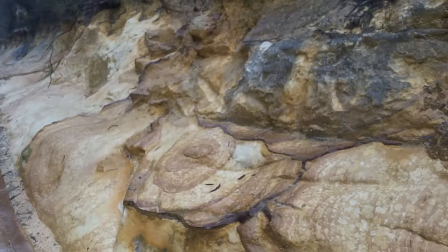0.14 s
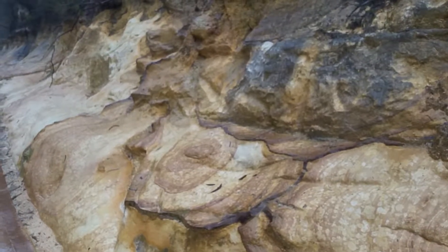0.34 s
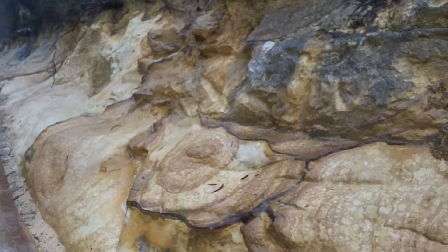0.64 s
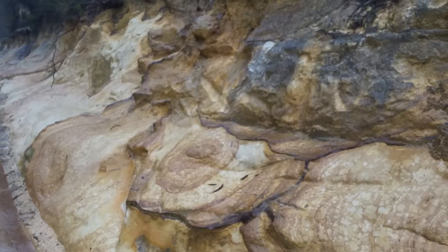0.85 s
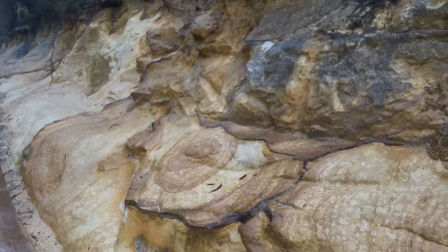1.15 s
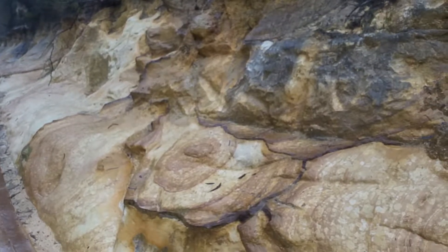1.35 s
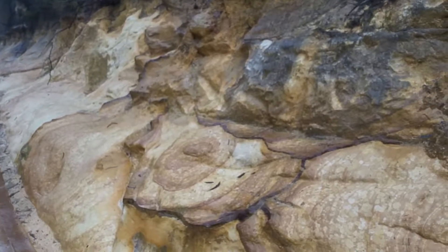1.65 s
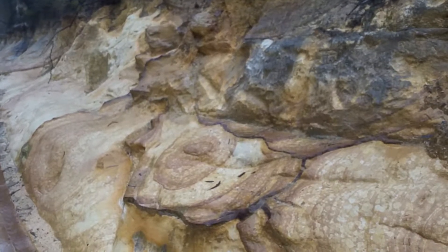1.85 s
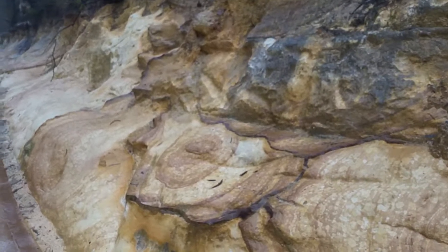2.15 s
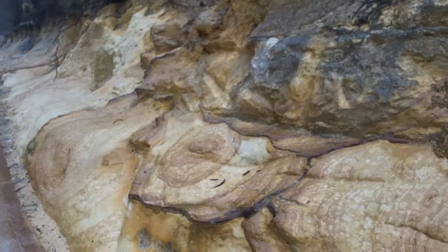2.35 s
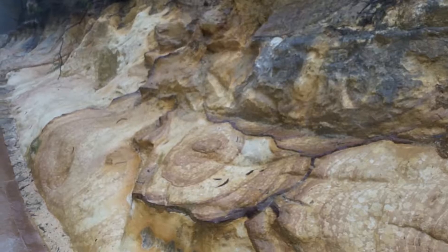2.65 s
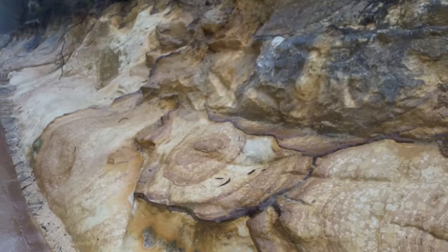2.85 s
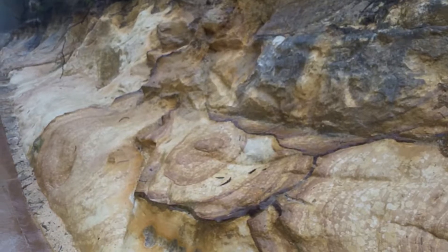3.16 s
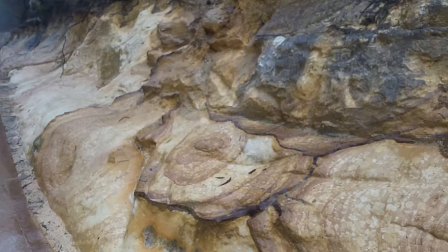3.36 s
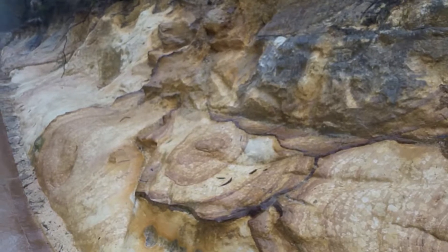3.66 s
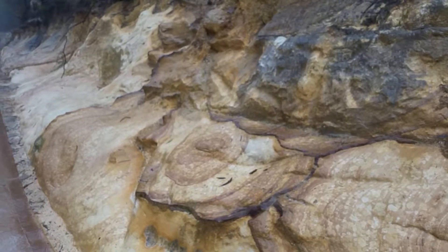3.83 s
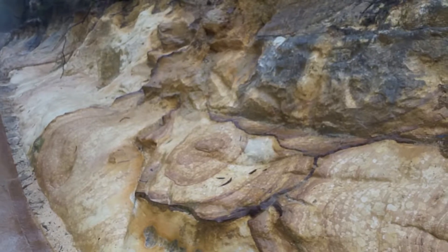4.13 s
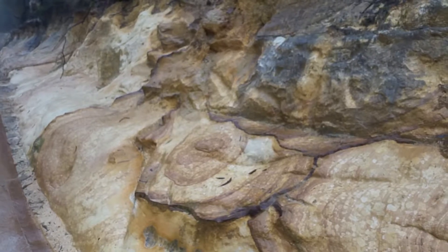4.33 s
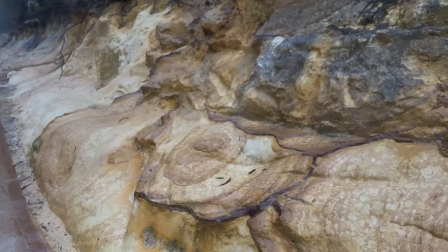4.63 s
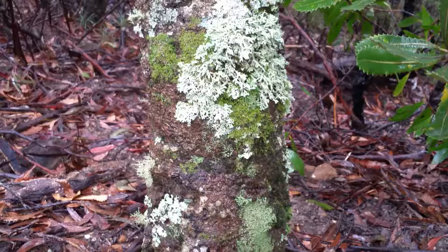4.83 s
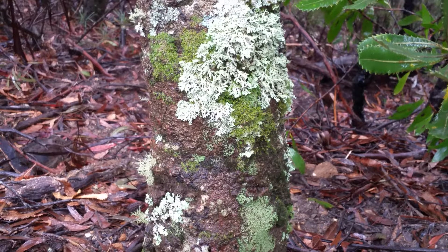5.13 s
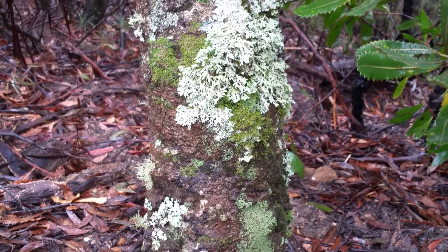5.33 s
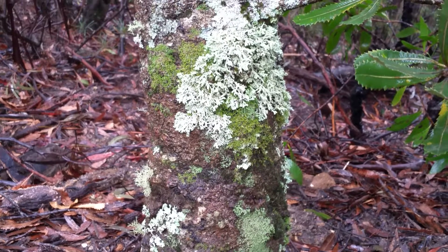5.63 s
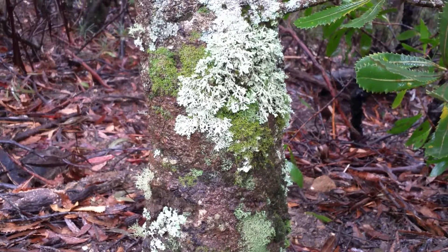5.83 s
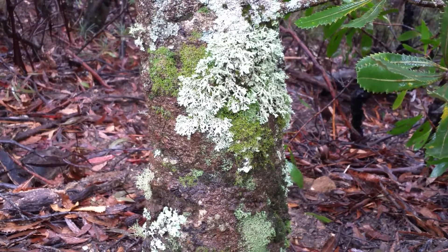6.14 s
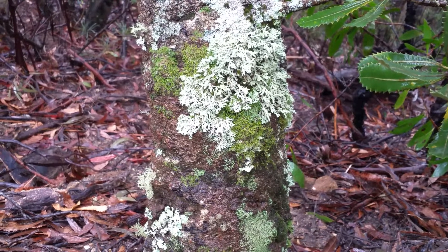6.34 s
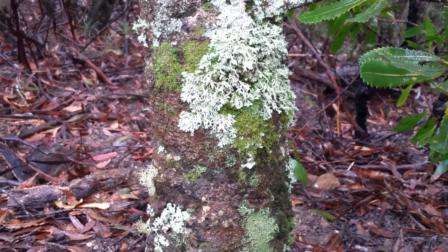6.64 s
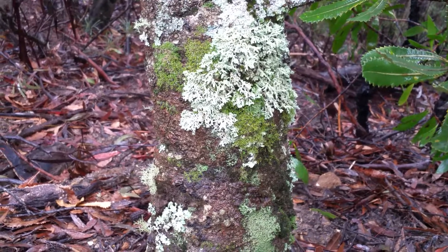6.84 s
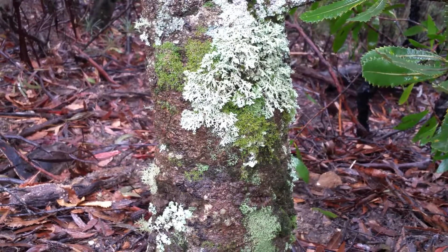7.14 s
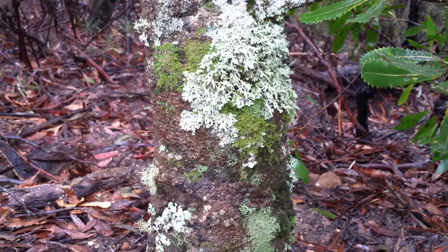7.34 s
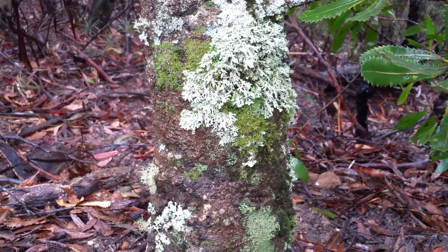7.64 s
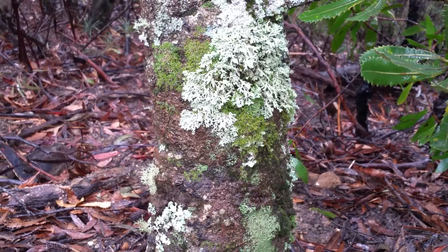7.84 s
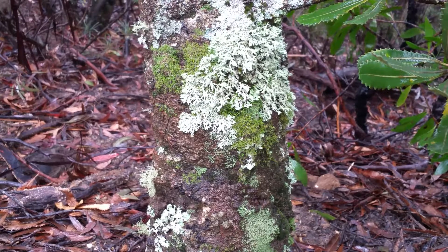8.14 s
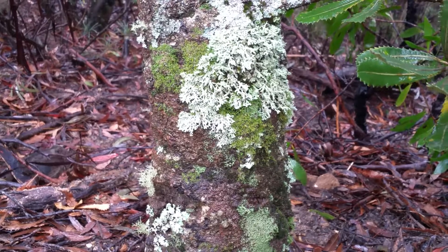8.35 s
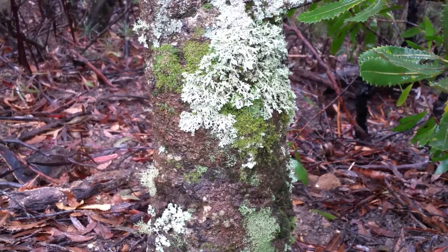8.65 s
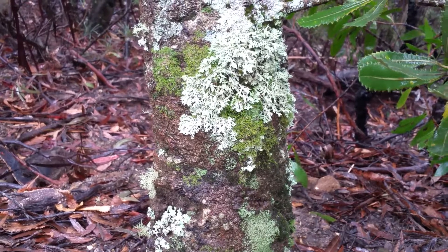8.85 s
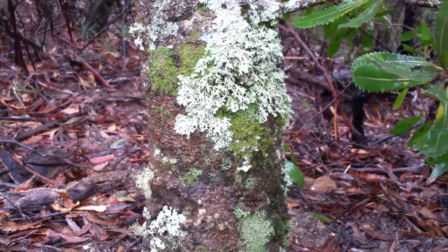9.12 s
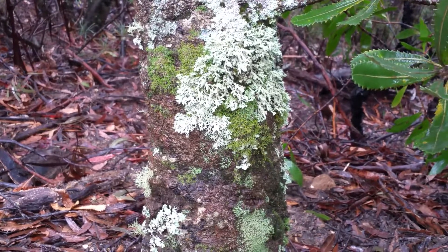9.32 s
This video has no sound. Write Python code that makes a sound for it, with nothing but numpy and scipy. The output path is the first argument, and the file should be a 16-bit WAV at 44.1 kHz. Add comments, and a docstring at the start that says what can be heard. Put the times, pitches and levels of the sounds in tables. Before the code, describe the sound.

Close, crisp water drops patter on leaves and soggy ground, growing heavier midway, while a faraway engine idles low, then rises in pitch.

```python
"""Wet bush in the rain, among trunks and rock, with a distant engine.
Heavy drips slap the leaf litter close by: each is a damped pressure pulse, a thud and a noise burst of spray.
Lighter drips, random patter, leaf ticks, bubble plops and sizzling droplets join them, with a short echo.
Far drops merge into a wash of coloured noise; over it lies a fine hiss, and both follow the rain's strength.
The engine sums its firing note, uneven orders above it and a rumble; it idles, then picks up speed."""
import sys
import numpy as np
from scipy import signal
from scipy.fft import rfft, irfft, next_fast_len
from scipy.io import wavfile
from scipy.ndimage import map_coordinates

SR = 44100
rng = np.random.default_rng(int(sys.argv[2]) if len(sys.argv) > 2 else 0)


def store_wav(level_fs):
    """Save 16-bit WAV to argv[1]."""
    pcm = np.round(np.clip(np.atleast_2d(level_fs), -1, 1) * 32767)
    wavfile.write(sys.argv[1], SR, pcm.T.astype(np.int16))


N = 418068
TOP_HZ = 16000  # band limit
DROP_SIZE = 2048  # samples in one drop sound
# fine hiss at the usual rain [dB], and its gain per dB of rain [dB/dB]
HISS_DB, HISS_GROWS = -64, 0.37
# lag of the right ear behind the left: mean and spread [ms]
LAG_MS, LAG_SPREAD_MS = 0.079, 0.097


def amp(db):
    """Logarithmic level: decibels to amplitude gain."""
    return 10 ** (np.asarray(db) / 20)


def unit(x):
    """Power normalization: scale to rms 1."""
    return x / np.sqrt(np.mean(x ** 2) + 1e-20)


def along(points, hz):
    """Logarithmic frequency scale: read (frequency [Hz], value) points between their knots."""
    f, v = np.transpose(points)
    return np.interp(np.log(hz + 1), np.log(f + 1), v)


def curves(rows):
    """Linear interpolation in time: one value per sample for each column after the time."""
    s, *cols = np.transpose(rows)
    return [np.interp(np.arange(N) / SR, s, c) for c in cols]


def wobble(rate):
    """Band-limited fluctuation: a smooth curve through random knots, rate knots a second."""
    knots = rng.standard_normal(int(N * rate / SR) + 4)
    return map_coordinates(knots, [np.arange(N) * rate / SR])


def filtered(x, response):
    """Linear filtering: multiply the spectrum of x by a response of frequency."""
    m = next_fast_len(N + SR // 2)
    return irfft(rfft(x, m) * response(np.fft.rfftfreq(m, 1 / SR)), m)[..., :N]


def place(times, sounds):
    """Superposition: sum short stereo sounds (2 x events x samples) at their times [s]."""
    first = np.round(times * SR).astype(int)[:, None]
    at = np.maximum(first + np.arange(sounds.shape[-1]), 0)
    return np.array([np.bincount(at.ravel(), side.ravel(), N)[:N] for side in sounds])


# likeness of the two ears in a diffuse sound: (frequency [Hz], coherence [0 to 1])
EAR_COHERENCE = [(100, 0.77), (300, 0.74), (600, 0.3), (1200, 0), (3000, 0.48), (10000, 0)]


def rush(spectrum):
    """Diffuse-field coherence: coloured stereo noise of rms 1, mixed from a mid and a side signal."""
    def turn(hz):
        return np.arccos(np.clip(along(EAR_COHERENCE, hz), -1, 1)) / 2

    def response(hz):
        return amp(along(spectrum, hz)) * [np.cos(turn(hz)), np.sin(turn(hz))]

    mid, side = filtered(rng.standard_normal((2, N)), response)
    return unit(np.array([mid + side, mid - side]))


# strength of the rain, driving the wash, the hiss and the random drops: (time [s], strength [dB])
RAIN_STRENGTH = [(0.0, -55), (0.48, -58.5), (0.7, -54.5), (1.0, -56), (1.3, -54), (2.05, -57), (2.45, -58),
                 (2.72, -62), (3.15, -58.5), (3.55, -55.5), (4.4, -57.5), (4.85, -55.5), (5.1, -50),
                 (5.6, -53), (6.4, -51), (8.3, -55.5), (9.1, -52), (9.48, -54.5)]


def surge():
    """Relative level: dB by which the rain exceeds its usual strength, per sample."""
    usual_db = -55
    return curves(RAIN_STRENGTH)[0] - usual_db


# spectrum of the wash: (frequency [Hz], relative density [dB per Hz])
WASH_SPECTRUM = [(100, -17), (200, -8), (400, -1), (950, 0.5), (1600, -7.5), (2500, -4.5), (4000, -27),
                 (7000, -15.5), (16000, -29)]
# spectrum of the fine hiss: (frequency [Hz], relative density [dB per Hz])
HISS_SPECTRUM = [(1500, -5.5), (4000, 3.5), (5500, 3.5), (7000, -9), (8300, 0), (10000, 4.5), (11300, -7),
                 (16000, -13)]


def wash_and_hiss(wash_db=-58.5, wash_grows=0.55):
    """Incoherent summation: far drops merge into a wash; over it lies a fine hiss, partly microphone noise."""
    strength = surge()
    wash_flicker = 1.5 * wobble(14) + 2.1 * wobble(110)
    hiss_flicker = 0.7 * wobble(4) + 1.5 * wobble(24) + 1.9 * wobble(90)
    wash = amp(wash_db + wash_grows * strength + wash_flicker) * rush(WASH_SPECTRUM)
    hiss = amp(HISS_DB + HISS_GROWS * strength + hiss_flicker) * rush(HISS_SPECTRUM)
    return wash + hiss


# engine: (time [s], mean firing rate [Hz], relative throb level [dB], firing note level [dB])
ENGINE_COURSE = [(0, 54.03, -52.5, -63), (2.4, 53.9, -53.5, -61), (4.8, 53.73, -53.5, -65),
                 (5.1, 56.14, -55.5, -68), (6.1, 57.95, -56, -75), (6.8, 54.3, -57.5, -66),
                 (7.4, 58.3, -52, -55), (7.7, 65.7, -58.5, -59.5), (8.05, 70.6, -58, -51),
                 (8.55, 71.1, -61.5, -57.5), (8.9, 70.6, -64, -46), (9.2, 71.7, -57, -42.5),
                 (9.48, 69.8, -65, -42)]
# uneven orders above the firing note: (multiple of the engine cycle, mean relative level [dB])
THROB_ORDERS = [(10, -6), (11, -10), (12, -8), (13, 0), (14, -.5), (16, -1)]
# spectrum of the engine's rumble: (frequency [Hz], relative density [dB per Hz])
RUMBLE_SPECTRUM = [(15, -34), (30, -5), (42, -17), (65, -23), (95, -1), (135, -4), (200, -6.5), (400, -31)]


def engine(rumble_db=-59, throb_db=1.0, note_db=0, cylinders=8):
    """Engine orders: uneven orders above the firing note beat at idle and give way to the firing note."""
    firing_hz, throb, note = curves(ENGINE_COURSE)
    unsteady_hz = firing_hz * (1 + 0.0027 * wobble(2.61))
    cycle = 2 * np.pi * np.cumsum(unsteady_hz) / SR / cylinders
    uneven = 0
    for order, db in THROB_ORDERS:
        level = amp(db + 0.81 * wobble(2.5))
        uneven = uneven + level * np.sin(order * cycle + rng.uniform(0, 2 * np.pi))
    firing = unit(np.sin(cylinders * cycle)) * amp(note + note_db + 0.35 * wobble(4.2))
    return amp(throb + throb_db) * unit(uneven) + firing + amp(rumble_db) * rush(RUMBLE_SPECTRUM)


def slap_shape(pitch, damping, hz):
    """Damped oscillator: a wet surface swings barely once; lower pitches have a softer edge. Peak 1."""
    swing = 1j * hz / pitch
    softening = (1 + 1j * hz / (4 * pitch + 1500)) ** 2
    pulse = swing / (1 + damping * swing + swing ** 2) / softening
    return pulse / np.abs(irfft(pulse)).max(axis=1, keepdims=True)


# spectrum of the spray of a drop: (frequency [Hz], relative density [dB])
SPRAY_SPECTRUM = [(300, 21), (1500, 4.5), (3000, 8.5), (5000, 4.5), (6500, -4), (8300, 7.5), (10000, 2.5),
                  (12000, -8.5), (16000, -4)]


def slaps(rows, damping, scatter_db, scatter_t60, spray_db, spray_t60, ground_hz=355,
          ground_damping=0.86, litter_hz=650, ring=0.25, mist_db=-20, mist_t60=0.14):
    """Impact and scattering: a slap, a thud of the soil, their scatter off the litter, a burst of spray."""
    s, slap_db, pitch, thud_db, puff_db, lag_ms = np.transpose(rows)[:, :, None]
    t, hz = np.arange(DROP_SIZE) / SR, np.fft.rfftfreq(DROP_SIZE, 1 / SR)
    grit, mist = rng.standard_normal((len(s), 2, 2, DROP_SIZE)).transpose(1, 2, 0, 3)
    stiffness, height = rng.standard_normal((len(s), 2, 1)).swapaxes(0, 1)
    # every leaf adds a brief note of its own
    flex = 1j * hz / (1.6 * pitch * np.exp(0.46 * stiffness))
    leaf = 1 - ring / 2 + 2 * ring * (flex / 6) / (1 + flex / 6 + flex ** 2)
    slap = amp(slap_db) * slap_shape(pitch, damping, hz) * leaf
    thud = amp(thud_db) * slap_shape(np.array([[ground_hz]]), ground_damping, hz)
    # the ground just below answers after about a millisecond and hollows the sound
    ground_delay = .0009 * np.exp(.25 * height)
    pulse = (slap + thud) * (1 + .15 * np.exp(-2j * np.pi * hz * ground_delay))
    # the litter throws the pulse back by many short paths; long waves pass over it
    paths = grit * amp(-60 * t / scatter_t60) * (1 - np.exp(-t / 0.0002))
    paths = rfft(paths / np.linalg.norm(paths, axis=2, keepdims=True))
    paths = paths * 1j * hz / (litter_hz + 1j * hz)
    shared = np.clip(along(EAR_COHERENCE, hz), 0, 1)
    paths[1] = shared * paths[0] + np.sqrt(1 - shared ** 2) * paths[1]
    # the drop bursts in a gritty spit, then its droplets settle
    decay = amp(-60 * t / spray_t60) + amp(mist_db - 60 * t / mist_t60)
    burst = unit(mist * np.abs(mist)) * decay
    spray = rfft(amp(puff_db + spray_db) * burst) * unit(amp(along(SPRAY_SPECTRUM, hz)))
    # half the lag goes to each ear; the lead [s] leaves room for the earlier one
    lead = .001
    delay = lead + np.array([-lag_ms, lag_ms]) / 2000
    heard = (pulse * (1 + amp(scatter_db) * paths) + spray) * np.exp(-2j * np.pi * hz * delay)
    return place(s[:, 0] - lead, irfft(heard))


def patter(tap_db=-39, spread_db=5.0, tap_grows=0.63, pitch_hz=1750, soil_db=-14, spit_db=-31,
           edge_hz=4200, count=1500):
    """Random arrivals: smaller, farther drops fall more often and harder as the rain strengthens."""
    strength = surge()
    fallen = np.cumsum(amp(strength))
    at = np.searchsorted(fallen, rng.uniform(0, fallen[-1], count))
    size, leaf, soil, wet, bearing = rng.standard_normal((count, 5)).T
    level = tap_db + tap_grows * strength[at] + spread_db * np.minimum(size, 1.1)
    rows = np.transpose([at / SR, level, pitch_hz * np.exp(0.66 * leaf), level + soil_db + 4 * soil,
                         level + spit_db + 4 * wet, 0.2 * np.tanh(bearing)])
    taps = slaps(rows, damping=.75, scatter_db=-5, scatter_t60=.02, spray_db=0, spray_t60=.012)
    # foliage in the way dulls their top
    return filtered(taps, lambda hz: .45 + .55 / (1 + (hz / edge_hz) ** 4))


def spatter(over_db=15.0, spread_db=5, flight=0.008, count=90, size=10):
    """Damped resonance: random showers of tiny droplets from shattered drips prickle on the leaves."""
    t = np.arange(DROP_SIZE // 8) / SR
    shower = rng.uniform(0, N / SR, (count, 1))
    when = (shower + flight * rng.gamma(2, .5, (count, size))).reshape(-1, 1)
    weight, leaf, side = rng.standard_normal((len(when), 3, 1)).swapaxes(0, 1)
    pitch = np.clip(9800 * np.exp(0.25 * leaf), 3000, TOP_HZ)
    strength = np.interp(when, np.arange(N) / SR, surge())
    level = HISS_DB + HISS_GROWS * strength + over_db + spread_db * np.minimum(weight, 2)
    grain = amp(level) * np.sin(2 * np.pi * pitch * t) * np.exp(-pitch * t / 1.3)
    return place(when[:, 0], grain * amp(3.1 * np.array([side, -side])))


def landings(count, crowding):
    """Stratified arrivals: a random sample within each drop's own turn, turns shorter in stronger rain."""
    fallen = np.cumsum(amp(crowding * surge()))
    turn = (np.arange(count) + rng.uniform(0, 1, count)) / count
    return np.minimum(np.searchsorted(fallen, turn * fallen[-1]), N - 1)


def light_drips(slap_db=-30, spread_db=2.0, pitch_hz=1200, soil_db=-16, soil_spread_db=3.5, spit_db=-26,
                spit_spread_db=2.5, slap_grows=0.43, crowding=0.5, rebound_db=-6, rebound_s=0.008, count=105):
    """Double impact: lighter drips glance off onto a second leaf, thud and spray going with their size."""
    at = landings(count, crowding)
    traits = np.clip(rng.standard_normal((2 * count, 5)), -1.7, 1.7)
    size, leaf, soil, wet, bearing = traits.T
    first_db = slap_db + slap_grows * surge()[at]
    s = np.concatenate([at / SR, at / SR + rebound_s * rng.gamma(2, .5, count)])
    level = np.concatenate([first_db, first_db + rebound_db]) + spread_db * size
    rows = np.transpose([s, level, pitch_hz * np.exp(0.37 * leaf), level + soil_db + soil_spread_db * soil,
                         level + spit_db + spit_spread_db * wet, LAG_MS + 0.21 * bearing])
    return slaps(rows, damping=0.85, scatter_db=-5.5, scatter_t60=0.02, spray_db=2, spray_t60=.009)


# drips that trap a bubble in a puddle: (time [s], relative level [dB], starting pitch [Hz])
BUBBLE_PLOPS = [(0.2, -52, 600), (0.455, -51, 650), (1.752, -35.5, 567), (3.700, -44, 610)]


def plops(t60=0.045, attack=0.008, rise=3.2, gain_db=6):
    """Bubble resonance: trapped air rings briefly, rising as it nears the surface."""
    s, level_db, pitch = np.transpose(BUBBLE_PLOPS)[:, :, None]
    t = np.arange(DROP_SIZE) / SR
    envelope = amp(level_db + gain_db - 60 * t / t60) * (1 - np.exp(-(t / attack) ** 2))
    ring = envelope * np.sin(2 * np.pi * pitch * t * (1 + rise * t))
    return place(s[:, 0], np.array([ring, ring]))


# heavy close drips:
# (time [s], slap level [dB], slap pitch [Hz], thud level [dB], relative spray level [dB])
HEAVY_DRIPS = [(0.2618, -30.5, 880, -37, -43), (0.4094, -31, 1080, -40, -42.5),
               (0.5807, -23.5, 990, -34, -62), (0.6002, -23, 950, -46, -59),
               (0.6199, -23.5, 1140, -49, -56), (0.698, -21, 725, -44, -53), (0.7532, -26, 1110, -50, -61),
               (0.8133, -19.5, 1090, -30, -43), (0.8744, -18, 830, -31, -44),
               (1.1327, -25, 1350, -45.5, -41), (1.1838, -22.5, 1260, -32.5, -56),
               (1.2461, -23, 1070, -47.5, -60), (1.4407, -19, 860, -34, -39), (1.4718, -25, 1090, -34, -64),
               (1.5131, -22.5, 806, -38, -59), (1.6495, -29.5, 810, -47, -63), (1.871, -27, 1160, -55, -47),
               (1.9128, -25.5, 990, -59, -45), (2.0208, -23.5, 1230, -46, -44),
               (2.0411, -25.5, 1090, -53, -46), (2.2083, -26, 905, -34, -37.5),
               (2.3699, -20.5, 730, -27.5, -43), (2.5585, -26.5, 905, -30.5, -46),
               (2.907, -22.5, 1150, -50, -42), (3.1277, -15.5, 1010, -47, -37.5),
               (3.2165, -28, 940, -33, -46), (3.3574, -24.5, 1040, -46, -48),
               (3.3919, -23.5, 756, -35, -50), (3.4446, -25.5, 900, -50, -42),
               (3.5046, -23.5, 630, -34, -44), (3.5804, -25, 730, -46, -48), (3.6455, -22.5, 870, -34, -54),
               (3.7019, -27, 674, -39, -57), (3.7683, -21.5, 1190, -40, -64),
               (3.8369, -25, 840, -45, -40.5), (3.9368, -32, 950, -25.5, -42),
               (4.1244, -26.5, 1170, -46, -50.5), (4.2321, -23, 1210, -46, -54),
               (4.2603, -26, 730, -36, -40.5), (4.6166, -14, 1130, -44, -54),
               (4.7753, -19, 1180, -30.5, -58), (5.0123, -13.5, 1450, -13, -52),
               (5.0323, -9.5, 960, -23, -34.5), (5.0834, -30, 910, -20.5, -40.5),
               (5.1827, -28, 590, -9, -41), (5.2294, -21, 1040, -39, -45), (5.305, -19.5, 1030, -49, -47),
               (5.4817, -12.5, 1030, -18.5, -60), (5.5282, -14.5, 950, -32, -57),
               (5.6843, -16, 770, -26.5, -35), (5.7135, -24.5, 750, -45, -67),
               (5.9402, -22.5, 1050, -51, -65), (6.2278, -24, 2290, -18, -59),
               (6.2976, -22.5, 653, -24.5, -44), (6.3997, -23.5, 1190, -53, -52),
               (6.9117, -16.5, 1300, -36, -50), (7.2793, -20.5, 1170, -47, -46),
               (7.3439, -15.5, 1450, -14, -35), (7.3678, -21.5, 1410, -33, -51),
               (7.5561, -21, 1050, -28.5, -48), (7.768, -22.5, 835, -40, -72),
               (7.8361, -24, 1270, -35.5, -65), (8.0608, -6.5, 1102, -16, -46),
               (8.4251, -14, 1156, -22, -39), (8.4674, -17.5, 1019, -29, -40),
               (8.8974, -13, 633, -11.5, -32.5), (8.9712, -19.5, 1060, -26, -41),
               (9.2444, -15, 800, -34, -45)]


def drips():
    """Interaural delay: heavy canopy drips land close by, mostly a little to the left."""
    lag_ms = LAG_MS + LAG_SPREAD_MS * rng.standard_normal(len(HEAVY_DRIPS))
    rows = np.column_stack([HEAVY_DRIPS, lag_ms])
    return slaps(rows, damping=0.88, scatter_db=-6.0, scatter_t60=0.017, spray_db=4.5, spray_t60=0.0072)


# big splashes whose fine spray sizzles over the leaves: (time [s], relative level [dB])
BIG_SPLASHES = [(0.737, -40), (2.023, -40), (3.384, -39.5), (5.6507, -35.5), (6.2584, -39), (6.6413, -41),
                (7.706, -40), (8.1119, -38), (8.2254, -37.5), (8.992, -40)]
# spectrum of the sizzle: (frequency [Hz], relative density [dB])
SIZZLE_SPECTRUM = [(1500, -27), (4000, 2), (6500, -5), (8500, 3), (10500, 4), (12000, -5), (16000, -3)]


def sizzles(gain_db=-10.5, swell=0.0057, small_db=-45, count=22):
    """Shaped noise: clouds of tiny droplets swell and fade, small splashes at random among the big ones."""
    small_times = landings(count, crowding=0.3) / SR
    small = np.transpose([small_times, small_db + rng.uniform(-2.5, 2.5, count)])
    s, level_db = np.vstack([BIG_SPLASHES, small]).T[:, :, None]
    t, hz = np.arange(DROP_SIZE) / SR, np.fft.rfftfreq(DROP_SIZE, 1 / SR)
    grit = rng.standard_normal((len(s), 2, DROP_SIZE)).swapaxes(0, 1)
    cloud = unit(grit * np.abs(grit)) * t / swell * np.exp(1 - t / swell)
    coloured = irfft(rfft(cloud) * unit(amp(along(SIZZLE_SPECTRUM, hz))))
    return place(s[:, 0], amp(level_db + gain_db) * coloured)


# shaken twigs letting go of their water: (start [s], length [s], mean level [dB])
TWIG_FLURRIES = [(1.44, 0.15, -34), (2.02, 0.037, -33), (3.6, 0.087, -31), (5.96, 0.025, -34.5),
                 (6.11, 0.03, -33), (6.24, 0.082, -29.5), (7.35, 0.05, -36), (7.825, 0.11, -27.5),
                 (9.14, 0.13, -26.5)]


def flurries(spread_db=3, pitch_hz=1550, soil_db=-21, spit_db=-27, count=7):
    """Clustered impacts: the drops of a shaken twig land close together, light and crisp."""
    start, length, level_db = np.repeat(TWIG_FLURRIES, count, axis=0).T
    size, leaf, bearing = np.clip(rng.standard_normal((len(start), 3)), -1.7, 1.7).T
    s = start + length * rng.uniform(0, 1, len(start))
    level = level_db + spread_db * size
    rows = np.transpose([s, level, pitch_hz * np.exp(0.69 * leaf), level + soil_db, level + spit_db,
                         LAG_MS + LAG_SPREAD_MS * bearing])
    return slaps(rows, damping=0.85, scatter_db=-5, scatter_t60=0.018, spray_db=2, spray_t60=.008)


# drops that make a stiff leaf tick: (time [s], relative level [dB], pitch [Hz])
LEAF_TICKS = [(1.729, -37, 12100), (2.0278, -36, 13600), (2.2073, -31, 9800), (2.429, -24.5, 7700),
              (5.1823, -17.5, 4840), (7.171, -28, 8020), (7.616, -33, 12900), (8.0608, -14, 7540),
              (8.215, -30.5, 12000), (8.8966, -7, 2580)]


def ticks(gain_db=-4, ring_t60=0.0061, fizz_db=-13, fizz_t60=0.045):
    """Resonant filtering: a stiff leaf clicks brightly and the droplet shatters."""
    s, level_db, pitch = np.transpose(LEAF_TICKS)[:, :, None]
    t, hz = np.arange(DROP_SIZE) / SR, np.fft.rfftfreq(DROP_SIZE, 1 / SR)
    decay = amp(-60 * t / ring_t60) + amp(fizz_db - 60 * t / fizz_t60)
    burst = rng.standard_normal((len(s), 2, DROP_SIZE)).swapaxes(0, 1) * decay
    swing = 1j * hz / pitch
    leaf = (0.62 * swing / (1 + 0.64 * swing + swing ** 2)) ** 2
    return place(s[:, 0], amp(level_db + gain_db) * irfft(rfft(burst) * leaf))


# echo among trunks and rock: (frequency [Hz], time to decay by 60 dB [s])
ECHO_DECAY = [(200, 0.066), (1500, 0.045), (10000, 0.06)]


def echo(x):
    """Diffuse reverberation: trunks and rock return a short tail, exponentially decaying noise."""
    hz, t, z = signal.stft(rng.standard_normal((2, SR // 3)), SR, nperseg=256)
    decay = amp(-60 * t / along(ECHO_DECAY, hz)[:, None])
    tail = signal.istft(z * decay, SR, nperseg=256)[1]
    tail = np.pad(tail / np.linalg.norm(tail[0]), ((0, 0), (SR // 200, 0)))  # 5 ms pre-delay
    return signal.fftconvolve(x, tail, axes=1)[:, :N]


def scene():
    """Superposition: near drops with their echo, over the wash, the hiss and the engine."""
    background = wash_and_hiss() + engine()
    near = patter() + spatter() + light_drips() + plops() + drips() + sizzles() + flurries() + ticks()
    return background + near + amp(-16.5) * echo(near)


def record(dry):
    """Channel equalization: left brighter at the top, right fuller in the bass, cut at the band limit."""
    # (frequency [Hz], left minus right [dB])
    balance = [(60, -2.1), (500, 0.12), (1200, -0.13), (4000, -1.7), (8000, 0.91), (14000, 4.1)]

    def response(hz):
        return amp(np.outer([1, -1], along(balance, hz)) / 2) * (hz < TOP_HZ)

    return filtered(dry, response)


dry = scene()
out = record(dry)
store_wav(out)
```